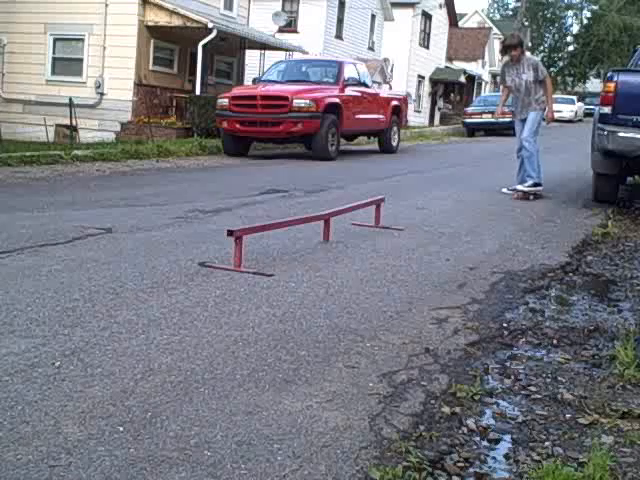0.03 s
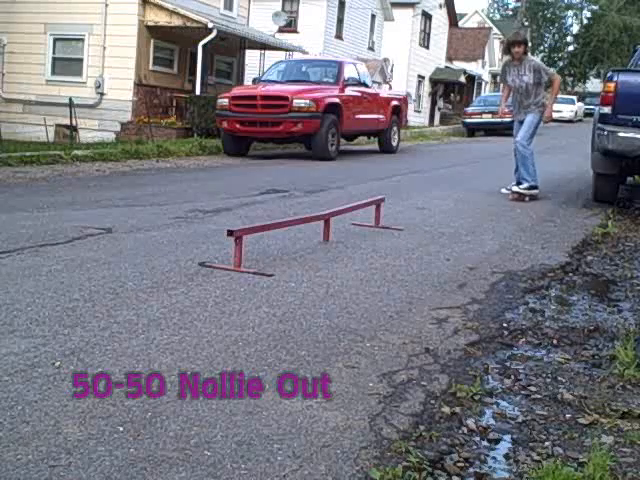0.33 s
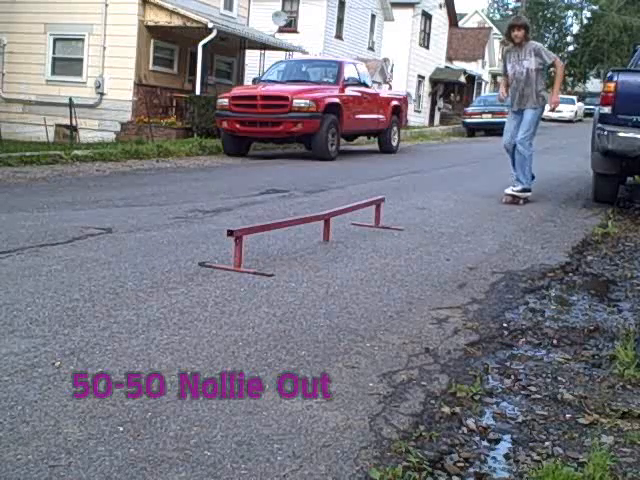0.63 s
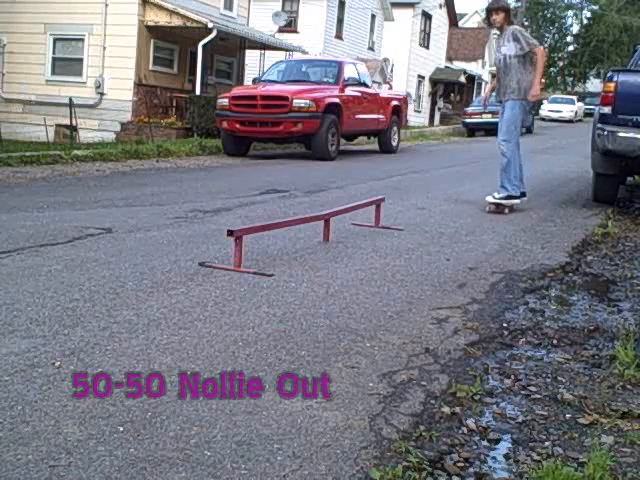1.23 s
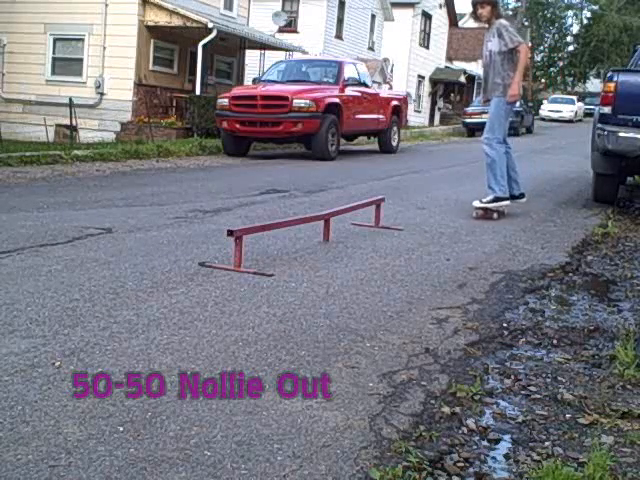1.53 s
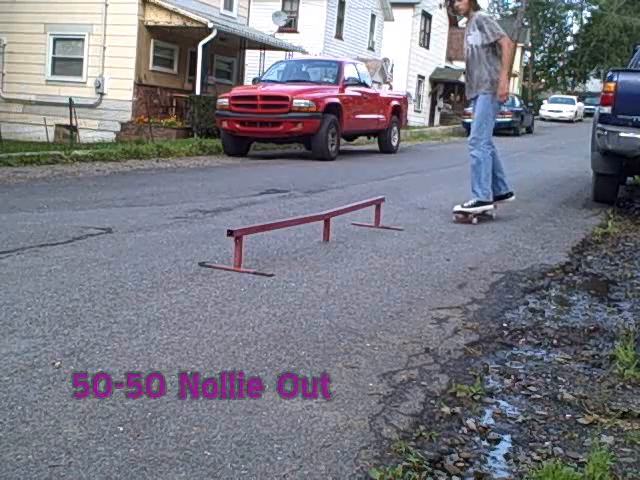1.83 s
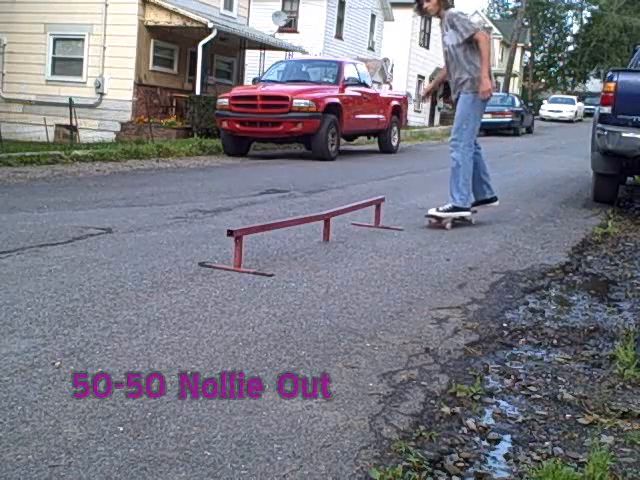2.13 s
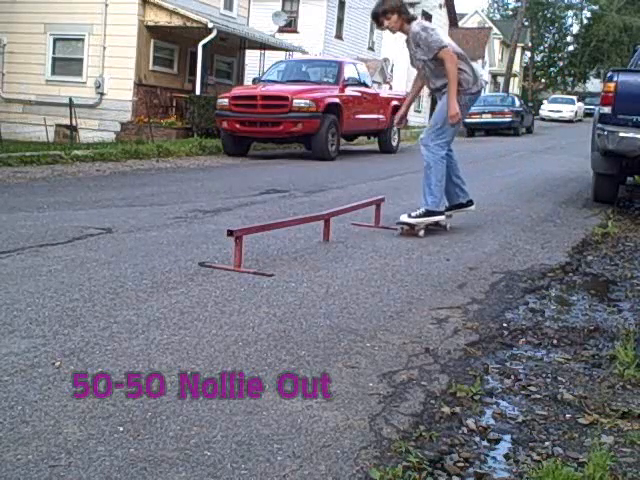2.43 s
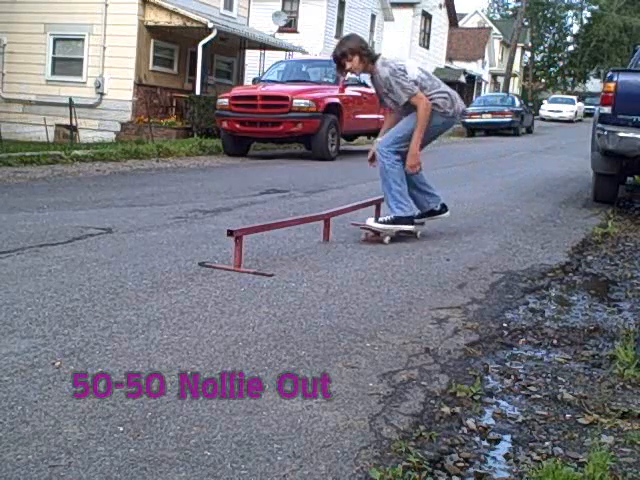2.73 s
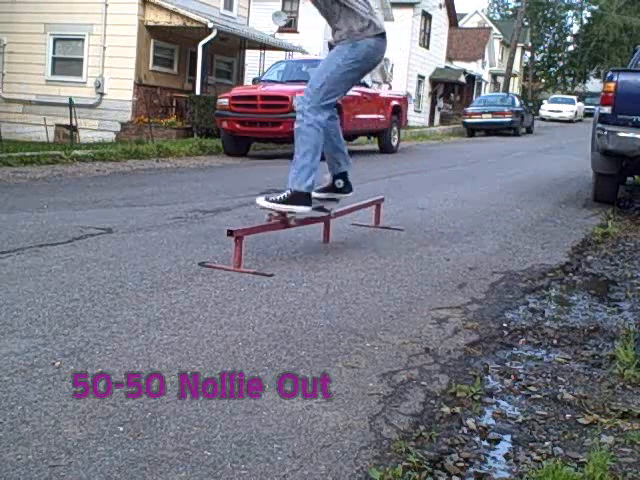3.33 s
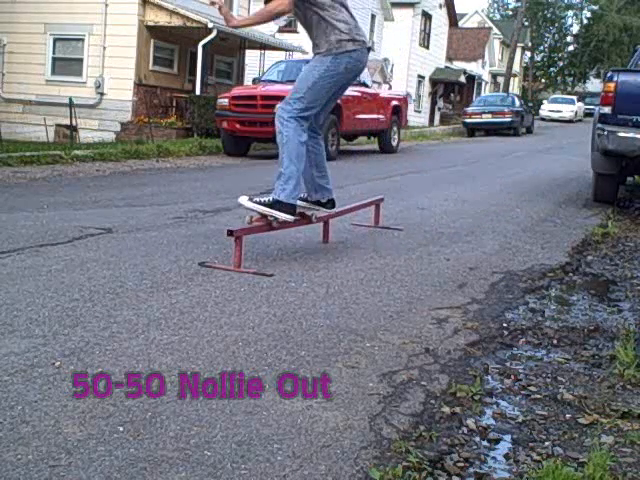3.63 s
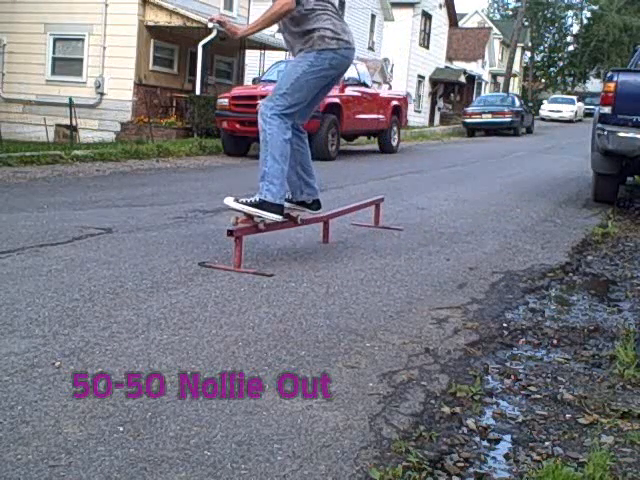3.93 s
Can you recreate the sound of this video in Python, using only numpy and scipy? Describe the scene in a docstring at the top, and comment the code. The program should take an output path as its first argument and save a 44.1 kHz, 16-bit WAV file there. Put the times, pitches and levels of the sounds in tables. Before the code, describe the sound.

A skateboard rolls toward the microphone on a rough street, wheels rumbling and clicking over grit. The tail pops, the trucks hit a steel rail with a loud crack, then grind and chatter as the metal rings.

```python
"""A rough asphalt street, one microphone, short echoes off house fronts and parked cars.
A skateboard rolls up towards the microphone, its wheels rumbling and crunching grit.
The tail pops, the board clips a steel rail, and the first truck lands on it with a crack that
overloads the microphone. The second truck slams down; both grind and chatter along the ringing rail."""
import sys
import numpy as np
from scipy import signal
from scipy.fft import rfft, irfft
from scipy.io import wavfile

SR = 44100
rng = np.random.default_rng(int(sys.argv[2]) if len(sys.argv) > 2 else 0)


def pcm_store(signal):
    """Save signal as 16-bit PCM."""
    levels = np.round(np.clip(np.atleast_2d(signal), -1, 1) * 32767)
    wavfile.write(sys.argv[1], SR, levels.astype(np.int16).T)


N = 176400
LIFT_S, CRACK_S = 3.178, 3.51  # the wheels leave the road; the first truck strikes the rail

# Bright spectrum of grit and clicks: frequency_hz, gain_db
STONE = [(200, -8), (1000, -4.5), (2300, 1.5), (3700, -4.5), (5200, 1), (8200, -1), (10500, 2.5),
         (12300, 0), (13300, -5), (16000, -15.5)]
# Spectrum of the knocked wooden board: frequency_hz, gain_db
WOOD = [(120, -11), (220, -12), (290, -3), (650, 0), (1100, 3.5), (1400, -7.5), (2600, -9.5), (5300, -14.5),
        (8000, -20), (16000, -31)]


def amp(db):
    return 10 ** (np.asarray(db) / 20)


def unit(x):
    return x / np.sqrt(np.mean(x ** 2) + 1e-20)


def curve(points):
    """Gain over time from (time_s, level_db) points."""
    return amp(np.interp(np.arange(N) / SR, *np.transpose(points)))


def add(mix, start_s, sound):
    part = mix[round(start_s * SR):][:len(sound)]
    part += sound[:len(part)]


def lowpass(x, hz):
    return signal.sosfilt(signal.butter(2, hz, fs=SR, output="sos"), x)


def band(x, hz, ratio):
    return signal.sosfilt(signal.butter(2, [hz / ratio, hz * ratio], "band", fs=SR, output="sos"), x)


def through(x, response):
    """Convolves with a response scaled to energy 1."""
    return signal.fftconvolve(x, response / np.linalg.norm(response))[:N]


def colour(x, points, size=4096):
    """Minimum-phase filter shaped by (frequency_hz, gain_db) points."""
    hz, db = np.transpose(points)
    bins_hz = abs(np.fft.fftfreq(size, 1 / SR))
    log_gain = np.log(amp(np.interp(np.log(bins_hz + 1), np.log(hz), db)))
    spectrum = np.exp(np.conj(signal.hilbert(log_gain)))
    return through(x, np.fft.ifft(spectrum).real[:size // 2])


def ring(x, modes):
    """Drives a set of decaying modes."""
    t = np.arange(SR) / SR
    response = sum(amp(db - 60 * t / t60) * np.sin(2 * np.pi * (hz * t + rng.random()))
                   for hz, db, t60 in modes)
    return through(x, response)


def grains(per_s, spread_db, smooth):
    """Random tiny contacts of uneven size over a share of smooth friction."""
    sizes = amp(spread_db * np.minimum(rng.exponential(1, N), 4)) * rng.choice([-1, 1], N)
    contacts = unit(sizes * (rng.random(N) < per_s / SR))
    return unit(contacts + smooth * rng.standard_normal(N))


def drift(rate_hz):
    """Slow random motion of rms 1."""
    rolloff = np.exp(-(np.fft.rfftfreq(N, 1 / SR) / rate_hz) ** 2)
    return unit(irfft(rfft(rng.standard_normal(N)) * rolloff, N))


def flutter(rate_hz, depth_db):
    """Random unevenness of contact, as a gain."""
    return unit(amp(depth_db * drift(rate_hz)))


def blows(rows, rise_s):
    """Rattling contacts: noise bursts from (start_s, level_db, decay_s) rows."""
    force, t = np.zeros(N), np.arange(SR // 5) / SR
    for start_s, db, decay_s in rows:
        envelope = np.minimum(t / rise_s, 1) * np.exp(-np.maximum(t - rise_s, 0) / decay_s)
        add(force, start_s, amp(db) * envelope * rng.standard_normal(len(t)))
    return force


def air():
    """The street's steady background: a low rumble under faint hiss."""
    # Background spectrum: frequency_hz, gain_db
    air_spectrum = [(20, -10.5), (50, 2.5), (120, -2), (200, -11), (450, -17), (1000, -18.5), (1600, -26),
                    (4200, -32), (5600, -25), (6600, -36), (12000, -36.5), (16000, -38)]
    return amp(-50) * colour(rng.standard_normal(N), air_spectrum)


def wheels():
    """Asphalt shakes the deck and grit crackles until the wheels lift; pebbles click and knock."""
    # Wheel rumble on the approach: time_s, level_db
    rumble_levels = [(0.14, -64.5), (0.54, -53), (0.68, -42.5), (0.77, -46.5), (0.94, -38), (0.97, -47),
                     (1.46, -51), (1.55, -39), (1.92, -50.5), (2.01, -44.5), (2.38, -40.5), (3.03, -44),
                     (3.17, -36.5)]
    # Crunching grit: time_s, level_db
    grit_levels = [(0.15, -70), (0.53, -58), (0.68, -52), (0.93, -47), (1.11, -54.5), (1.34, -49),
                   (1.37, -56.5), (1.78, -46), (1.79, -43.5), (1.86, -55.5), (2.32, -51.5), (2.43, -40.5),
                   (2.61, -52.5), (2.71, -47), (2.96, -50.5), (3.16, -43)]
    # Spectrum of the shaken deck: frequency_hz, gain_db
    deck_spectrum = [(70, -16.5), (130, -2), (200, 2.5), (330, 0), (450, -4), (700, -4), (1050, -2.5),
                     (1450, -17.5), (2100, -14.5), (3500, -27.5), (16000, -37)]
    # Pebbles and cracks in the road: start_s, click_db, thud_db, decay_s
    pebbles = [(.276, -43.5, -45, 0.0031), (.703, -50, -33.5, .003), (.572, -44, -36, 0.0017),
               (.836, -63, -34, 0.0049), (0.865, -40, -29.5, 0.0029), (0.92, -35.5, -49, 0.0058),
               (.939, -30.5, -45, 0.0016), (1.178, -39, -37, 0.0019), (1.199, -42, -37, 0.0053),
               (1.313, -39, -43.5, 0.01), (1.482, -46, -32.5, 0.0048), (1.554, -44.5, -29, 0.013),
               (1.796, -30.5, -39, 0.0074), (2.018, -40.5, -30, 0.0065), (2.103, -42, -34, 0.0031),
               (2.187, -34.5, -34, 0.0013), (2.271, -51, -27.5, 0.003), (2.341, -39.5, -33, .003),
               (2.360, -34.5, -31, 0.0012), (2.364, -48, -22.5, 0.0027), (2.479, -26, -50, 0.001),
               (2.687, -39.5, -32.5, 0.0097), (2.715, -34.5, -35, .005), (2.803, -61, -28.5, 0.003),
               (2.840, -31, -30.5, 0.0019), (3.163, -32, -33, .002), (3.177, -28.5, -41, 0.0051)]
    grounded = amp(-457 * np.maximum(np.arange(N) / SR - LIFT_S, 0))
    bumps = grains(per_s=1500, spread_db=3.5, smooth=0.57) * flutter(rate_hz=100, depth_db=1.4)
    rumble = colour(bumps * curve(rumble_levels) * grounded, deck_spectrum)
    sand = grains(per_s=1800, spread_db=8.5, smooth=1.22) * flutter(rate_hz=120, depth_db=3)
    ticks = grains(per_s=150, spread_db=4, smooth=0) * flutter(rate_hz=65, depth_db=4)
    crackle = through(ticks, blows([(0, 0, 0.00056)], rise_s=0.00015))
    grit = (amp(-1.5) * sand + amp(-3.5) * crackle) * curve(grit_levels) * grounded
    thuds = blows([(s, thud, decay) for s, _, thud, decay in pebbles], rise_s=0.00062)
    clicks = blows([(s, click, decay) for s, click, _, decay in pebbles], rise_s=0.00084)
    return rumble + colour(grit + clicks, STONE) + lowpass(colour(thuds, WOOD), hz=1520)


def running_gear():
    """Wheels scrub, bearings whistle and then whirr in the air, and a truck squeals on the rail."""
    # Scrubs, whistles and, last, the truck's squeal: start_s, length_s, pitch_hz, level_db, width_hz
    squeaks = [(.58, 0.18, 2105, -53, 1200), (0.832, 0.08, 2316, -49.5, 900), (2.53, 0.18, 1895, -52, 49.7),
               (2.949, .15, 2300, -56, 230), (3.836, .03, 939, -27.5, 40)]
    squeaking = np.zeros(N)
    for start_s, length_s, hz, db, width_hz in squeaks:
        t = np.arange(0, length_s, 1 / SR)
        a, b = (unit(lowpass(rng.standard_normal(N), width_hz / 2))[-len(t):] for _ in range(2))
        fuzzy_tone = a * np.cos(2 * np.pi * hz * t) + b * np.sin(2 * np.pi * hz * t)
        grip = flutter(rate_hz=80, depth_db=3)[:len(t)]
        swell = np.sin(np.pi * t / length_s) ** .5
        add(squeaking, start_s, amp(db) * swell * grip * fuzzy_tone)
    aloft_s = np.arange(N) / SR - LIFT_S
    whirr = amp(-55 - 18 * aloft_s) * (aloft_s > 0) * rng.standard_normal(N)
    return squeaking + colour(whirr, STONE)


def board():
    """The wood knocks and clicks: shoe scuffs, the pop of the tail and a light touch on the rail."""
    # Contacts on the board: start_s, knock_db, click_db, decay_s
    contacts = [(3.282, -40.5, -41, 0.0063), (3.293, -43, -41.5, 0.018), (3.310, -23, -31, 0.0038),
                (3.316, -35, -41, 0.013), (3.475, -28, -39, 0.0037), (3.477, -45, -30.5, 0.0021)]
    knocks = blows([(s, knock, decay) for s, knock, _, decay in contacts], rise_s=0.00034)
    clicks = blows([(s, click, decay) for s, _, click, decay in contacts], rise_s=0.0006)
    return colour(knocks, WOOD) + colour(clicks, STONE)


def crack():
    """The first truck meets the rail, metal on metal, in one short, bright burst."""
    # Spectrum of the impact: frequency_hz, gain_db
    crack_spectrum = [(60, -15), (300, -7), (950, -2.5), (1500, -8.5), (3200, -5), (4300, 2), (5700, -0.5),
                      (7000, -4.5), (9500, -9.5), (13500, -12), (15500, -10.5)]
    # Ringing of the truck: pitch_hz, level_db, t60_s
    truck_modes = [(930, -9.5, .04), (4600, -1, .02), (4800, -1, 0.021), (5350, 1.5, .016),
                   (7830, 0.5, .016), (12100, -1, 0.016)]
    length_s, fade_db_per_s = 0.0195, 358
    t, force = np.arange(0, length_s, 1 / SR), np.zeros(N)
    add(force, CRACK_S, amp(-7 - fade_db_per_s * t) * rng.standard_normal(len(t)))
    damping = amp(-6000 * np.maximum(np.arange(N) / SR - CRACK_S - length_s, 0))
    return (amp(-1) * colour(force, crack_spectrum) + amp(-4.5) * ring(force, truck_modes)) * damping


def grind():
    """Snagging friction and slams drive the rail's body and modes, with a bright hiss on top."""
    # Force of the sliding trucks: time_s, level_db
    slide_levels = [(3.512, -21), (3.535, -17), (3.58, -24.5), (3.635, -20), (3.67, -20), (3.70, -24),
                    (3.765, -23), (3.815, -25.5), (3.85, -30), (3.92, -32), (4.0, -34.5)]
    # Slams and chatter: start_s, level_db, decay_s, centre_hz, band_edge_ratio, thump_db, hiss_db
    slams = [(3.592, -9.5, 0.014, 1730, 1.9, -30, -23), (3.601, -3, .011, 1790, 1.74, -16.5, -19),
             (3.619, -6, .011, 1680, 1.47, -29, -20.5), (3.733, -8, 0.01, 1020, 1.35, -44, -28.5),
             (3.785, -9.5, 0.0083, 2000, 1.57, -35, -24.5)]
    # Body of the steel rail: frequency_hz, gain_db
    steel_spectrum = [(50, -15), (130, -10), (250, -3), (500, -8), (950, -4.5), (1350, -2), (2000, -6),
                      (2400, -10), (3050, -8), (3450, -15), (3900, -16.5), (4600, -25), (6500, -36),
                      (8000, -44), (16000, -60)]
    # Low thump under each slam: frequency_hz, gain_db
    thump_spectrum = [(25, -7), (70, -11), (150, -1), (250, -0.5), (330, -5), (600, -26), (3000, -76)]
    # Bright hiss during the grind, notched near 11 kHz by the overloaded recorder: frequency_hz, gain_db
    hiss_spectrum = [(2000, -26), (5000, -8.5), (6700, -9), (8000, -0.5), (9800, 0.5), (10300, -9),
                     (11000, -35), (11600, -12.5), (12200, -1), (13900, -4), (14600, -13), (16000, -17)]
    landed = np.arange(N) / SR > CRACK_S
    snags = grains(per_s=2500, spread_db=3.5, smooth=0.92) * flutter(rate_hz=160, depth_db=1.36)
    friction = curve(slide_levels) * landed * snags
    force, hiss = friction.copy(), amp(-11) * friction
    thumps, strikes = np.zeros(N), np.zeros(N)
    for start_s, db, decay_s, centre_hz, ratio, thump_db, hiss_db in slams:
        force += band(blows([(start_s, db, decay_s)], rise_s=0.0028), centre_hz, ratio)
        thumps += blows([(start_s, thump_db, decay_s)], rise_s=0.0031)
        hiss += blows([(start_s, hiss_db, decay_s)], rise_s=0.0027)
        # The clean part of each slam sets the rail ringing.
        strike = amp(db + 20.5) * band(signal.unit_impulse(SR // 20), centre_hz, ratio)
        add(strikes, start_s + 0.00186 * rng.random(), strike)
    body = amp(-1.5) * colour(force, steel_spectrum)
    ringing = amp(-7.5) * rail(friction, strikes)
    return body + ringing + colour(thumps, thump_spectrum) + colour(hiss, hiss_spectrum)


def rail(friction, strikes):
    """The trucks slide past nodes and antinodes, so each mode swells, fades and bends on its own."""
    # Ringing of the rail: pitch_hz, level_db, t60_s
    rail_modes = [(802, -9, .4), (942, -1, .35), (1034, -4, .45), (1196, 1, .3), (1344, 3.5, .25),
                  (1404, -5, .3), (1511, -6, .3), (1611, -1, .35), (1729, -4, .3), (1955, 0, .3),
                  (2125, -2, .25), (2301, -3, .4), (2745, -5, .25)]
    ringing, energy = np.zeros(N), 0
    for hz, db, t60 in rail_modes:
        bent_hz = hz * (1 + .004 * drift(rate_hz=21))  # the moving load bends the pitch
        phasor = np.exp(2j * np.pi * np.cumsum(bent_hz) / SR)
        feedback = np.exp(-np.log(1000) / (t60 * SR))
        drive = friction * flutter(rate_hz=11, depth_db=3.5) + strikes
        ringing += amp(db) * (phasor * signal.lfilter([1], [1, -feedback], drive / phasor)).real
        energy += amp(db) ** 2 / (1 - feedback ** 2) / 2
    return ringing / np.sqrt(energy)


def street(x, first_echo_s=.012, t60_s=0.38):
    """Direct sound plus scattered echoes from house fronts and parked cars."""
    t = np.arange(SR) / SR
    taps = rng.standard_normal(SR) * (rng.random(SR) < .05)
    echoes = through(x, taps * (t > first_echo_s) * amp(-60 * t / t60_s))
    return x + amp(-12) * lowpass(echoes, hz=6000)


def scene():
    """What reaches the microphone: street air, the ride with its echoes, and the dry crack."""
    return (air() + street(wheels() + running_gear() + board() + grind()) + crack())[None]


def record(dry, open_s=0.126, edge_hz=15950):
    """The microphone opens after a moment, clips at full scale and is band-limited."""
    opened = np.clip((np.arange(N) / SR - open_s) / 0.0045, 0, 1)
    clipped = np.clip(dry * opened, -1, 1)
    band_limit = signal.firwin(511, edge_hz, window=("kaiser", 9), fs=SR)
    return signal.oaconvolve(clipped, band_limit[None], "same")


dry = scene()
out = record(dry)
pcm_store(out)
```